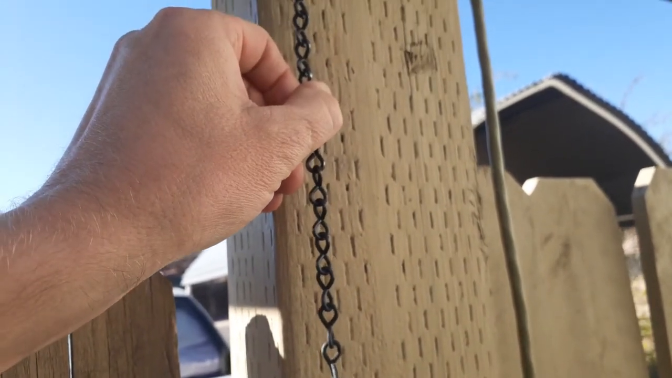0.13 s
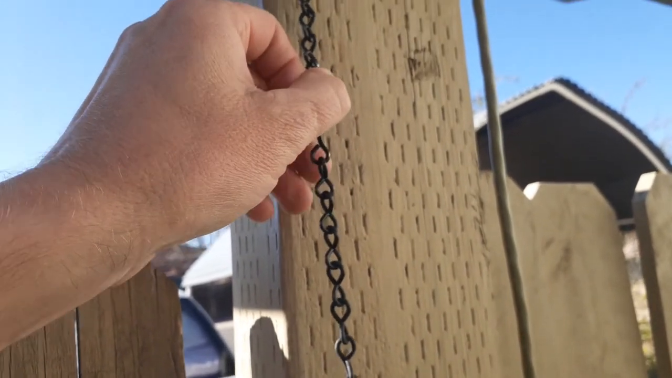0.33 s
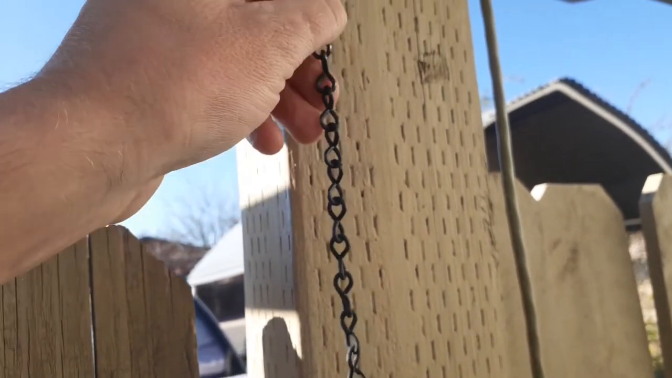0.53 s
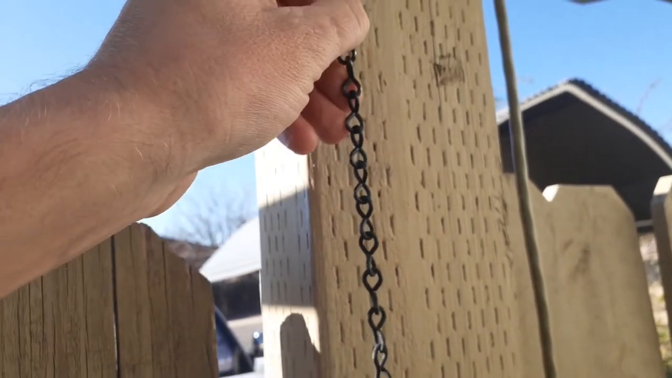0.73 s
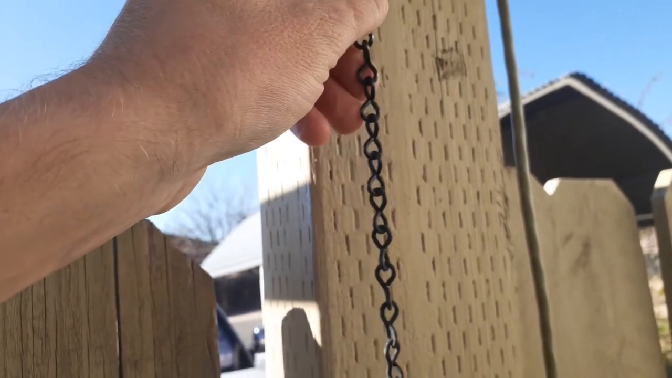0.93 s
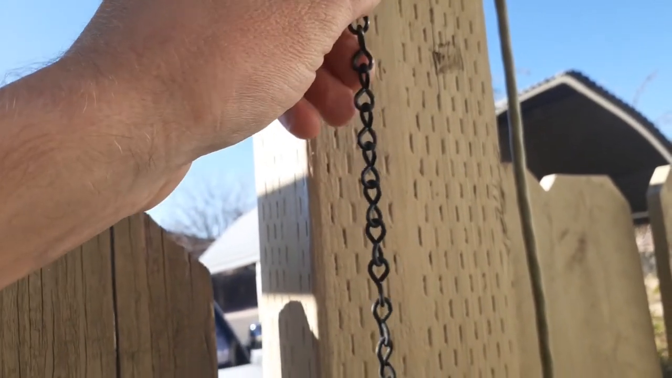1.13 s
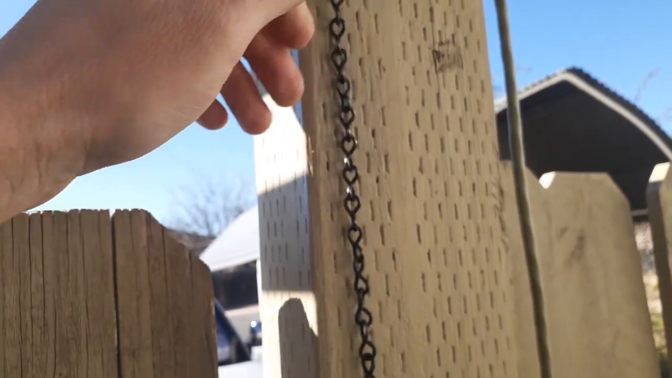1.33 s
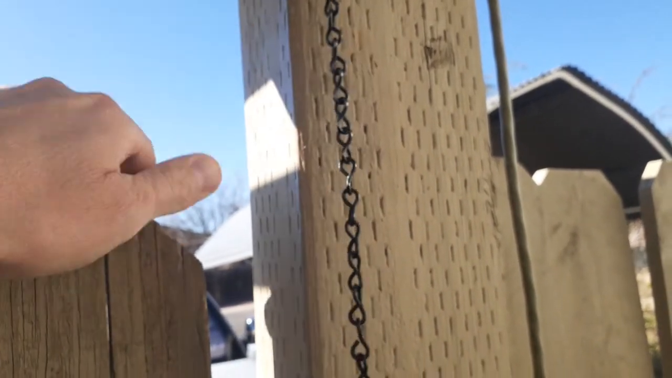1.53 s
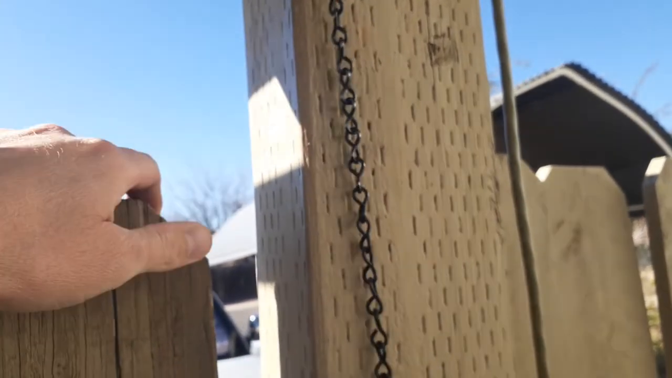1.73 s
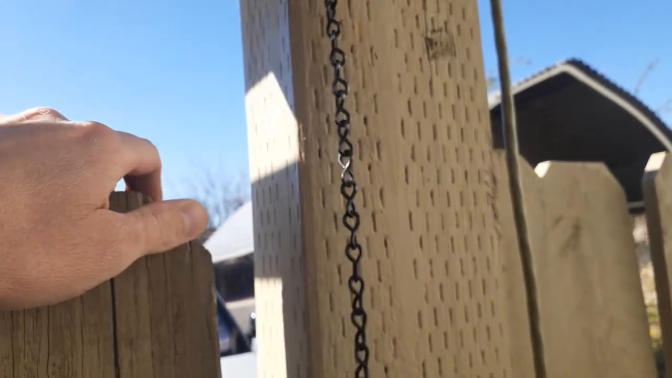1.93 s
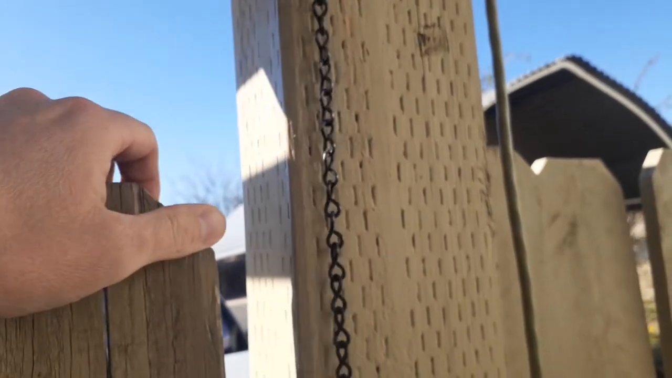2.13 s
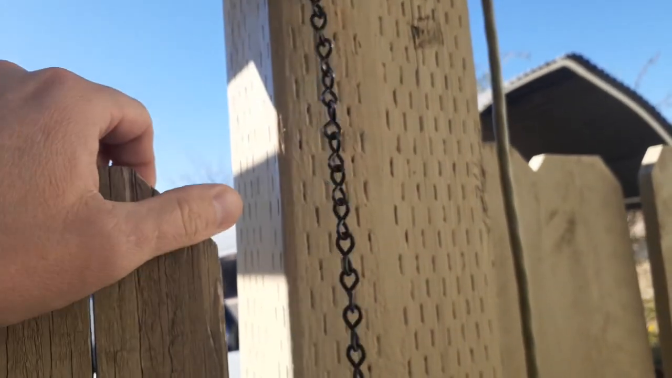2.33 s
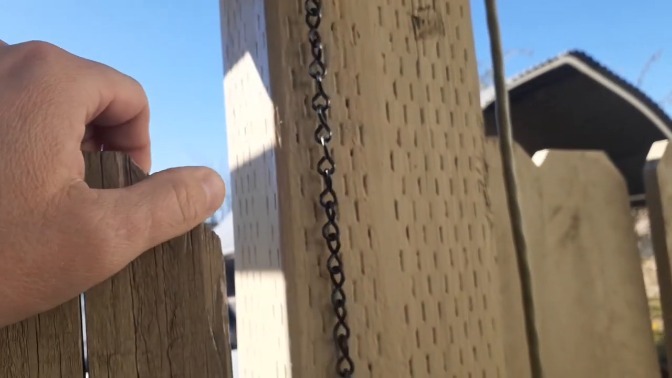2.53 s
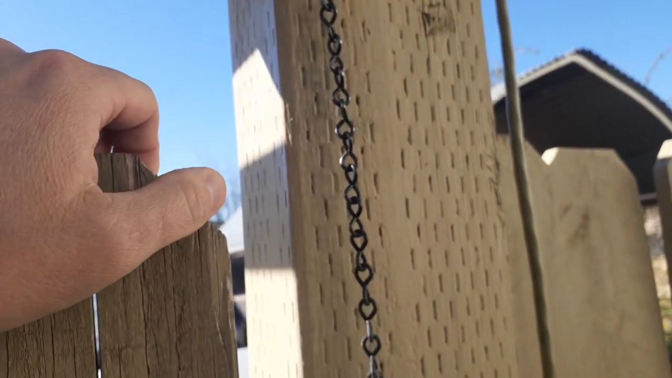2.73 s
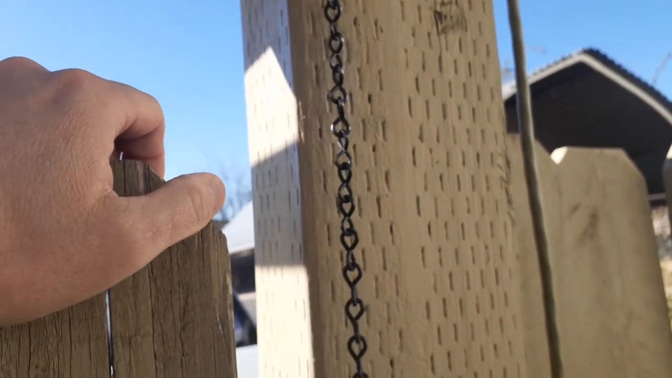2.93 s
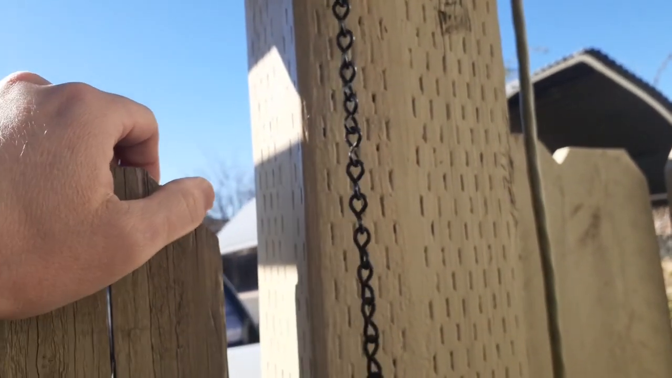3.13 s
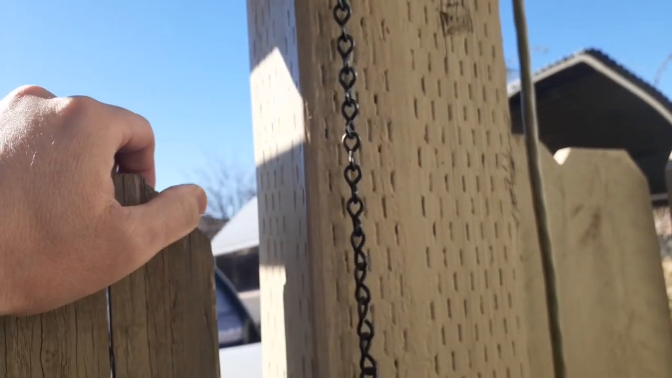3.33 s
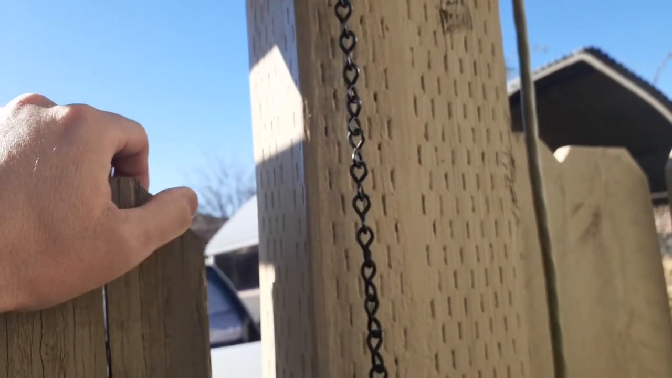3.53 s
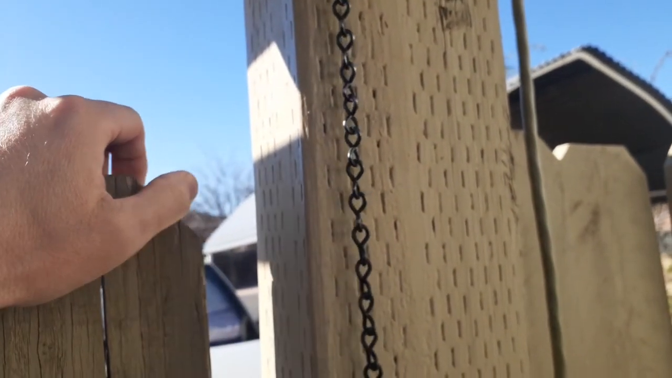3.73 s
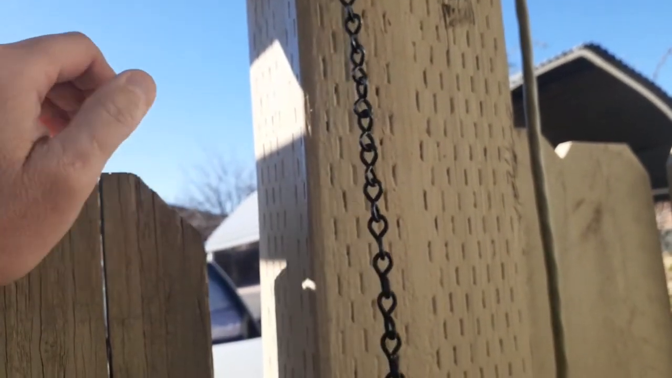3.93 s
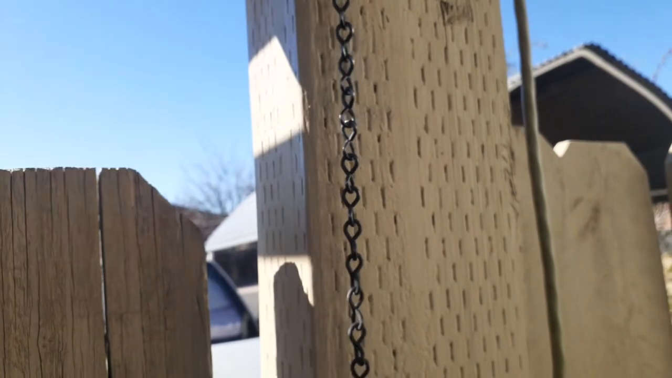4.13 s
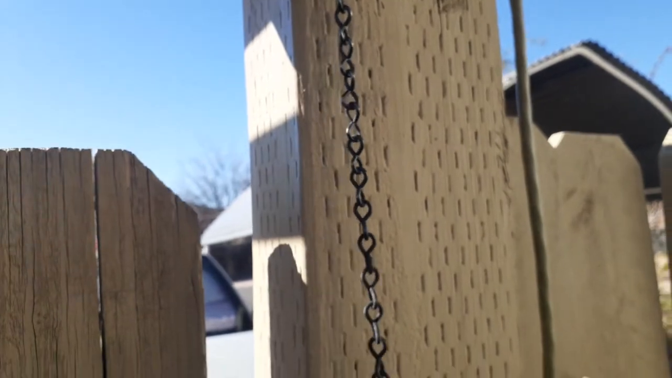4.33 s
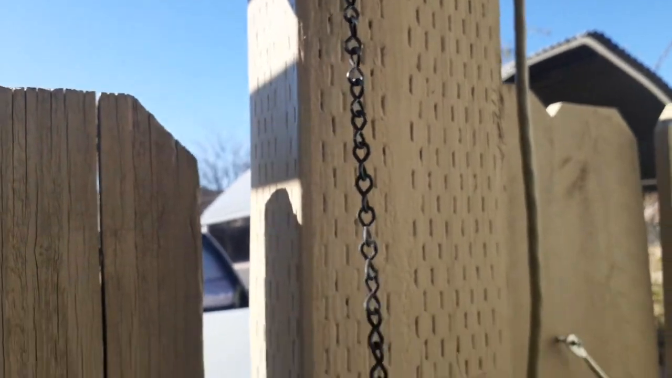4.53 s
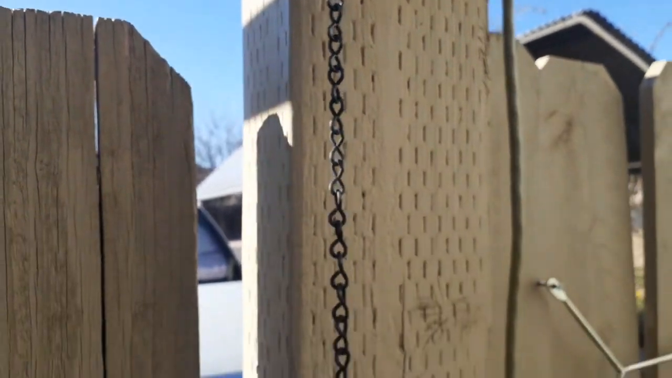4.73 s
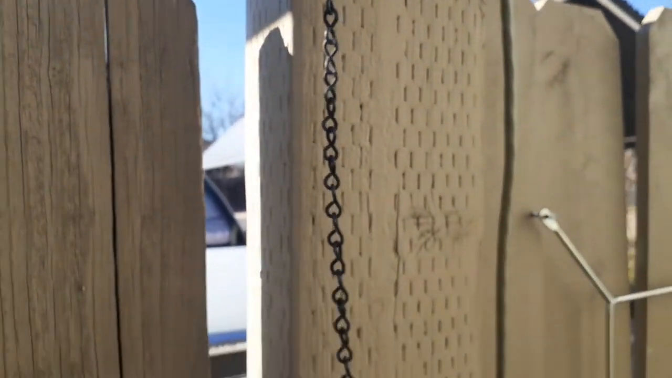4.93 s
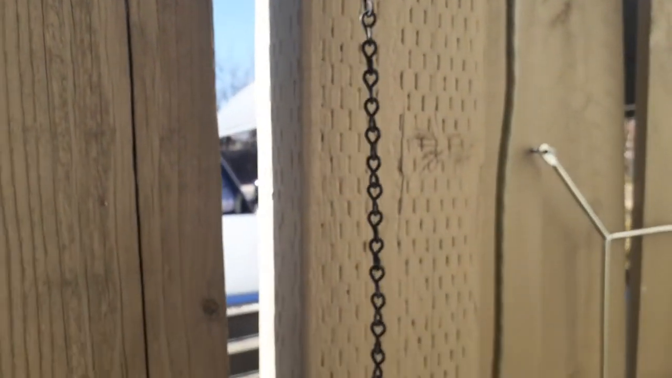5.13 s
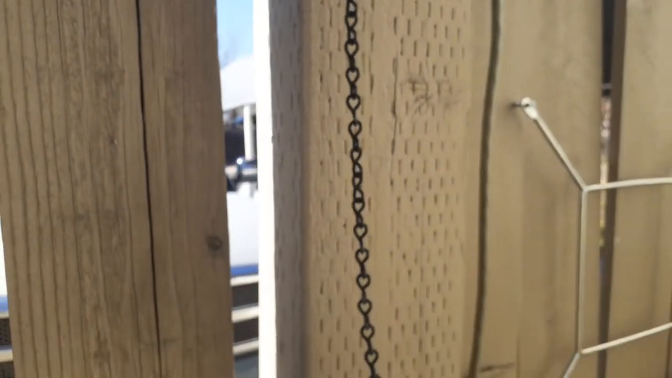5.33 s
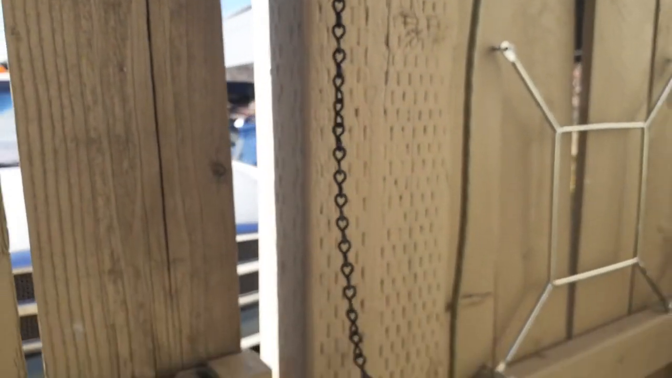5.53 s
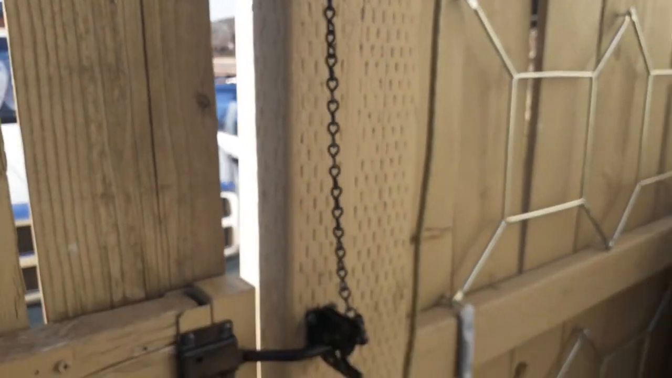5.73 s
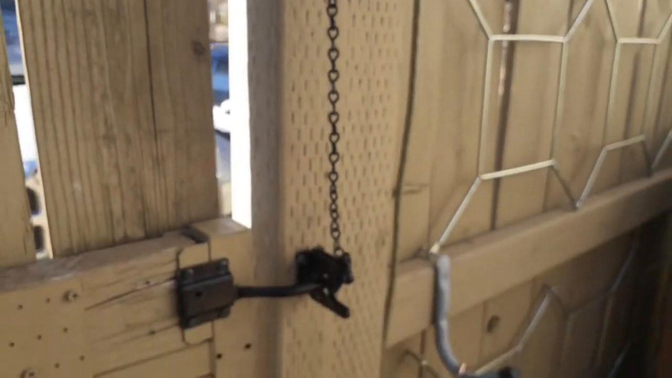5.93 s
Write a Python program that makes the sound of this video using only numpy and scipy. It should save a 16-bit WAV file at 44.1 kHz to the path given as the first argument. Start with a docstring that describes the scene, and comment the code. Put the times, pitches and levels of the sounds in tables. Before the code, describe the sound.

Close wooden knocks and bright chain jingles with a sharp steel latch clank outdoors, followed by gritty footsteps, faint birdsong and a low engine hum.

```python
"""Garden gate with a chain latch

A hand pulls a light chain that lifts the latch of a wooden garden gate, lets it go and eases the gate open.
Wood knocks are filtered noise that dies away; links and latch ring as sets of fading sine tones.
The hinge squeaks in unsteady tones, then shoes scuff on grit as grainy noise with short cracks.
Behind it an engine hums in sine tones, small birds twitter in rising chirps, and the air rumbles and hisses."""
import sys
import numpy as np
from scipy import signal
from scipy.fft import rfft, irfft, next_fast_len
from scipy.io import wavfile
from scipy.ndimage import uniform_filter1d

SR = 44100
rng = np.random.default_rng(int(sys.argv[2]) if len(sys.argv) > 2 else 0)


def generate_wav(sig):
    """Save sig (samples, or channels by samples) to the path in sys.argv[1] as 16-bit PCM at SR."""
    pcm = np.round(np.clip(np.atleast_2d(sig).T, -1, 1) * 32767).astype(np.int16)
    wavfile.write(sys.argv[1], SR, pcm)


N = 268833

# How alike noise is in the left and right channels: f/Hz, likeness (1 = the same, 0 = unrelated)
LIKENESS = [(60, 0.94), (250, 0.71), (600, 0.74), (1500, 0), (4000, 0.21), (16000, 0)]
# Colour of steel touching something hard: f/Hz, relative density/dB per Hz
STEEL_COLOUR = [(30, -40), (150, -25), (600, -9.5), (1200, 3.5), (2300, 4.5), (3300, -3), (4400, -3),
                (6200, 1), (7500, -8.5), (12000, -11.5), (16000, -9)]


def amp(db):
    """Turns decibels into a gain."""
    return 10 ** (np.asarray(db) / 20)


def evened(x):
    """Scales a sound to an rms of 1."""
    return x / np.sqrt(np.mean(x ** 2) + 1e-20)


def read(points, hz):
    """Reads a table between its points, along a log-frequency axis."""
    f, value = np.transpose(points)
    return np.interp(np.log(hz + 1), np.log(f + 1), value)


def add(mix, s, sound):
    """Mixes a stereo sound in at time s, cut off where the mix ends."""
    part = mix[:, max(round(s * SR), 0):][:, :sound.shape[1]]
    part += sound[:, :part.shape[1]]


def panned(side_db):
    """Gains of the two channels for a left-minus-right difference in dB."""
    return amp(np.array([[.5], [-.5]]) * side_db)


def pair(size):
    """Stereo noise whose channels are as alike at each frequency as LIKENESS says."""
    left, other = rfft(rng.standard_normal((2, size)))
    same = np.clip(read(LIKENESS, np.fft.rfftfreq(size, 1 / SR)), -1, 1)
    right = same * left + np.sqrt(1 - same ** 2) * other
    return irfft(np.array([left, right]), size)


def coloured(x, db):
    """Filters with the given dB at each frequency bin, without sounding ahead of the blow."""
    size = x.shape[1]
    log_gain = np.log(amp(np.r_[db, db[-2:0:-1]]))
    response = np.exp(np.conj(signal.hilbert(log_gain)))[:len(db)]  # minimum phase
    return irfft(rfft(x) * response, size)


def dying(x, t60):
    """Lets every band die at its own speed; t60 is the time to fall by 60 dB."""
    hz, t, bands = signal.stft(x, SR, nperseg=128)
    fade = 1e-3 ** (t / read(t60, hz)[:, None])
    return signal.istft(bands * fade, SR)[1][:, :x.shape[1]]


def lumps(hz, spacing_hz):
    """Random peaks and dips along frequency: each spot answers in its own way."""
    knots = np.arange(0, SR / 2, spacing_hz)
    return np.interp(hz, knots, rng.standard_normal(1024)[:len(knots)])


def spread(points, hz):
    """A spectrum in dB, scaled to a mean power of 1."""
    db = read(points, hz)
    return db - 10 * np.log10(np.mean(amp(db) ** 2))


def yard(x, size=16384, build_up_s=0.013):
    """Scattered echoes from fence, ground and house, as a tail of noise that builds up and dies away."""
    # Echo decay: f/Hz, time to fall by 60 dB/s
    echo_t60 = [(200, 1), (1500, 0.37), (5000, 0.33), (14000, 0.39)]
    t = np.arange(size) / SR
    tail = dying(pair(size), echo_t60) * (1 - np.exp(-t / build_up_s))
    return signal.fftconvolve(x, tail / np.linalg.norm(tail[0]), axes=1)[:, :N]


def engine(firing_hz=23.92, waver_hz=0.027, flutter=0.02):
    """A distant idling engine: tones at multiples of its firing rate, each wavering a little in level."""
    # Steady tones: multiple of the firing rate, relative level/dB
    steady_orders = [(5, -75), (8, -67.5), (9, -66.5), (12, -72.5), (15, -75), (16, -72), (20, -72)]
    # The two strongest tones over time: t/s, relative level of multiple 4/dB, of multiple 6/dB
    strong_orders = [(0.0, -68, -63), (0.05, -61, -56.5), (0.41, -64, -56.5), (0.54, -54.5, -53.5),
                     (0.69, -63, -55), (1.09, -64, -58.5), (1.34, -56, -54), (1.46, -58.5, -58),
                     (2.73, -55.5, -60), (3.14, -57.5, -66), (3.39, -54, -58.5), (4.23, -60, -67.5),
                     (5.82, -51.5, -61.5), (6.1, -52, -70)]
    t, knots = np.arange(N) / SR, np.arange(0, N / SR + 1, .2)

    def drift():
        """A slow random wander around zero."""
        return np.interp(t, knots, rng.standard_normal(len(knots)))

    turns = np.cumsum(firing_hz + waver_hz * drift()) / SR
    s, fourth_db, sixth_db = np.transpose(strong_orders)
    orders = steady_orders + [(4, np.interp(t, s, fourth_db)), (6, np.interp(t, s, sixth_db))]
    hum = np.zeros(N)
    for multiple, db in orders:
        height = amp(db) * (1 + flutter * drift())
        hum += height * np.sin(2 * np.pi * (multiple * turns + rng.random()))
    return np.sqrt(2) * hum


def air():
    """Far rumble and a fine hiss: shaped noise with a slowly changing level."""
    # Colour of the air: f/Hz, relative density/dB per Hz
    air_colour = [(15, -48), (25, -30), (43, -19), (74, -10.5), (108, -2.5), (217, -12), (300, -13),
                  (500, -19), (1160, -34), (2800, -43), (3900, -35), (7300, -51), (13600, -42),
                  (16000, -50)]
    # Loudness of the air: t/s, relative level/dB
    air_level = [(0, -63), (2.498, -60.5), (4.5, -61), (6.1, -59.5)]
    size = next_fast_len(N, real=True)
    gain = amp(read(air_colour, np.fft.rfftfreq(size, 1 / SR)))
    noise = irfft(rfft(pair(size)) * gain, size)[:, :N]
    return evened(noise) * amp(np.interp(np.arange(N) / SR, *np.transpose(air_level)))


def birds(chirps_per_s=21, direct=0.29, uneven_db=2):
    """Runs of quick rising chirps, each a little different; the run sinks slightly and echoes blur it."""
    # Bird phrases: start t/s, end t/s, middle pitch f/Hz, relative level/dB
    phrases = [(.05, 0.409, 4710, -80.5), (0.988, 1.54, 4420, -70.5), (1.654, 2.602, 3840, -68.5),
               (2.248, 2.738, 4670, -72.5), (2.535, 2.676, 5570, -76), (3.45, 4.047, 4725, -73),
               (4.075, 4.532, 4460, -77.5), (4.599, 5.006, 4530, -71.5), (5.082, 5.218, 4560, -74),
               (5.717, 6.1, 4310, -75.5)]
    phrase_fall, chirp_rise, chirp_spread = 0.045, .26, .03  # shares of the pitch
    out = np.zeros((2, N))
    for start, end, phrase_hz, db in phrases:
        size = max(round((end - start) * SR), 2)
        # number counts the chirps; progress runs from 0 to 1 within each
        number, progress = np.divmod(np.arange(size) / SR * chirps_per_s + rng.random(), 1)
        pitch, effort = rng.standard_normal((64, 2))[number.astype(int)].T
        sinking = phrase_fall * np.linspace(-.5, .5, size)
        hz = phrase_hz * (1 - sinking + chirp_rise * (progress - .5) + chirp_spread * pitch)
        loudness = np.sqrt(np.sin(np.pi * progress)) * amp(uneven_db * effort)
        song = np.sin(2 * np.pi * np.cumsum(hz) / SR) * loudness
        song = evened(song * signal.windows.tukey(size, .3))
        add(out, start, amp(db) * song * np.ones((2, 1)))
    return amp(3) * (direct * out + yard(out))


def knocks(level_db=-2.0, crack=0.12, crack_s=0.0018, size=8192, count=4):
    """Chain and latch hit wood, fall back ever weaker and leave it ringing; hard contacts are brighter."""
    # Knocks: t/s, relative level/dB, bass thud against that/dB, change one octave above treble_from_hz/dB
    contacts = [(.336, -61.5, 8, -18), (.421, -47.5, -3.5, -2.5), (0.443, -41.5, -7, -9.5),
                (.486, -30.5, -2.5, -5), (.503, -33.5, -10, -7.5), (.514, -30.5, -4.5, -9),
                (.608, -30, -19, -8.5), (.62, -41, 8, -7), (0.656, -62, 18, -2), (.721, -35, -17, -12),
                (0.778, -54.5, 12, -11.5), (.828, -48, -25.5, -19), (.852, -48, -3, -11.5),
                (0.862, -41, -9, -14), (.988, -48.5, -5, -26), (1.015, -55.5, -3, -8.5),
                (1.117, -59.5, 2, -23), (1.197, -41.5, -12, -7.5), (1.256, -32.5, -11.5, -8),
                (1.263, -36.5, -9, -3), (1.307, -35, -18, 0), (1.323, -40, -7, -2), (1.367, -38, -3, -10.5),
                (1.512, -43, -5, -7), (1.522, -41.5, -3, 0), (1.542, -33, -9.5, -6), (1.583, -40, 1, -14),
                (1.639, -50, 1.5, -5), (1.895, -48, 4, -10), (1.91, -41, -9, -8), (1.968, -32, -12, -4.5),
                (2.001, -49.5, 19, -5.5), (2.207, -60, 9, -4.5), (2.248, -67, 18.5, 0),
                (2.724, -43, -3, -10), (3.207, -42, -5, -5.5), (3.277, -44, 9.5, -14),
                (3.318, -41, 1.5, -10), (3.334, -36, -2.5, -18.5), (3.363, -47, 7, -6),
                (3.416, -53.5, 12.5, -6.5), (3.529, -48, 12.5, -6.5), (3.58, -34, -11, -3),
                (3.735, -57.5, 3, -3.5), (3.944, -57, -2.5, -4), (4.218, -54, 3, -10),
                (4.252, -46, -14, -11)]
    # Dense ring of post and boards: f/Hz, relative level/dB
    wood_colour = [(25, -27.5), (60, -9), (200, -3.5), (450, 2.5), (680, 2), (1200, 0), (1750, -1.5),
                   (2300, 1), (3200, 3), (4400, 3.5), (5400, 1.5), (6500, 7.5), (7400, -3.5), (11500, 5.5),
                   (15500, -1)]
    # How long the wood rings: f/Hz, time to fall by 60 dB/s
    wood_t60 = [(150, 0.17), (700, 0.21), (2000, 0.14), (5000, 0.089), (14000, 0.092)]
    # Wide resonances of the post: f/Hz, width/Hz, boost/dB
    post_peaks = [(695, 45, 6), (904, 50, 5), (1235, 60, 8), (1530, 50, 5), (2020, 70, 4), (2355, 80, 4),
                  (3374, 80, 4)]
    rebound_s, rebound_db, rebound_spread = 0.016, -11, 0.27  # spread is a share of the spacing
    treble_from_hz, treble_curve = 2000, 1.3  # a soft contact loses treble ever more steeply
    out, t, hz = np.zeros((2, N)), np.arange(size) / SR, np.fft.rfftfreq(size, 1 / SR)
    body_db = read(wood_colour, hz)
    for f, width, db in post_peaks:
        body_db = body_db + db / (1 + (2 * (hz - f) / width) ** 2)
    middle = (hz > 600) * (hz < 1400)  # this band sets the overall scale
    body_db -= 10 * np.log10(np.mean(amp(body_db) ** 2 * middle))
    attack = (1 - np.exp(-t / .0005)) * (1 + crack * np.exp(-t / crack_s))
    bass = read([(420, 1), (720, 0)], hz)  # the thud's share: all below 420 Hz, none above 720 Hz
    treble_octaves = np.log2(np.maximum(hz / treble_from_hz, 1)) ** treble_curve
    for s, db, thud_db, hardness in contacts:
        spot_db = 3.5 * lumps(hz, 85) + 2 * lumps(hz, 450)
        blow = np.zeros((2, size))
        for k, late in enumerate(rng.uniform(-1, 1, count)):
            hit = dying(pair(size), wood_t60) * attack
            add(blow, k * rebound_s * (1 + rebound_spread * late), amp(k * rebound_db) * hit)
        colour_db = body_db + thud_db * bass + hardness * treble_octaves + spot_db
        add(out, s, amp(db + level_db) * coloured(blow, colour_db))
    return out


def rubbing(strokes, spectrum, grain_db, lump_db, swell=0.42, size=16384):
    """Sliding contact: a stream of tiny slips of uneven size under each stroke."""
    out, t, hz = np.zeros((2, N)), np.arange(size) / SR, np.fft.rfftfreq(size, 1 / SR)
    for start, end, db, tilt_db in strokes:
        slips = np.repeat(np.minimum(rng.exponential(1, size // 64), 4), 64)  # 64 samples each
        grains = pair(size) * amp(grain_db * slips)
        tilt = tilt_db * np.log2(hz / 1000 + .1)
        rub = evened(coloured(grains, spread(spectrum, hz) + tilt + lump_db * lumps(hz, 200)))
        stroke = abs(np.sin(np.pi * np.clip(t / (end - start), 0, 1))) ** swell
        add(out, start, amp(db) * rub * stroke)
    return out


def drag():
    """The chain drags over wood in short grainy slides."""
    # Slides: start t/s, end t/s, level before the swell/dB, brightness/dB per octave
    slides = [(.422, .48, -47.5, -1.5), (1.915, 1.965, -42, -7), (3.215, 3.42, -47.5, -8),
              (3.46, 3.52, -52.5, -5)]
    return rubbing(slides, STEEL_COLOUR, grain_db=2.0, lump_db=7.0)


def ringing(blows, modes, favour_db, favour_octaves, detune, uneven_db, scatter, scatter_s, size=12288):
    """Steel rings in fading tones; where a blow lands favours some, and near wood scatters them to each ear."""
    out, t = np.zeros((2, N)), np.arange(size) / SR
    hz, mode_db, t60 = np.transpose(modes)
    for s, db, strongest_hz, side_db in blows:
        favoured = np.exp(-(np.log2(hz / strongest_hz) / favour_octaves) ** 2)
        height = amp(mode_db + favour_db * favoured + uneven_db * rng.standard_normal(len(hz)))
        pitch = hz * (1 + detune * rng.standard_normal(len(hz)))
        # unlike channels get unlike phases
        apart = np.sqrt(1 - np.clip(read(LIKENESS, hz), 0, 1)) * rng.uniform(-.6, .6, (2, len(hz)))
        waves = np.sin(2 * np.pi * pitch[:, None] * t + np.pi * apart[..., None])
        fade = np.exp(-np.log(1000) * t / t60[:, None])
        ring = (waves * height[:, None] * fade).sum(1) / np.linalg.norm(height)
        ring = ring * (1 - np.exp(-t / .0003))  # soft start
        echoes = pair(size) * np.exp(-t / scatter_s)
        echoes = echoes / np.linalg.norm(echoes[0])
        ring = ring + scatter * signal.fftconvolve(ring, echoes, axes=1)[:, :size]
        add(out, s, amp(db) * panned(side_db) * ring)
    return out


def chain(neighbour_db=-13, lag_s=0.0098, side_db=7):
    """Each tap rings a link and jostles its neighbour, a slightly different link, a moment later."""
    # Links tapping each other: t/s, relative level/dB, strongest ring f/Hz
    pings = [(.441, -48, 13570), (.475, -35, 11900), (1.207, -36, 14900), (1.23, -31.5, 13400),
             (1.272, -24.5, 14200), (1.33, -34, 14400), (1.365, -29, 14290), (1.499, -40, 14280),
             (1.525, -25.5, 12900), (1.542, -28, 13400), (1.721, -41.5, 15200), (1.911, -48.5, 13600),
             (1.982, -29.5, 13200), (2.206, -30, 14280), (2.727, -55, 13420), (3.23, -52, 13420),
             (3.36, -44, 14100), (3.416, -42.5, 14300), (3.58, -31, 14000), (3.63, -41, 13200),
             (3.705, -45, 14700), (3.895, -43.5, 13650)]
    # Tones of a link: f/Hz, relative level/dB, time to fall by 60 dB/s
    link_modes = [(5140, -28, .2), (5650, -28, .13), (7840, -25, .2), (9265, -23, .13), (11420, -27, .16),
                  (11910, -12, .11), (13380, -2, .07), (13490, -3, .1), (14280, 1, .115), (14530, -13, .11),
                  (14780, -13, .11), (15200, -17, .08)]
    taps = np.array([(s, db, hz, side_db) for s, db, hz in pings])
    jostled = taps + np.outer(rng.uniform(.5, 1.5, len(taps)), [lag_s, 0, 0, 0])
    first = ringing(taps, link_modes, favour_db=7, favour_octaves=.04, detune=.0008, uneven_db=1.5,
                    scatter=.4, scatter_s=.005)
    second = ringing(jostled, link_modes, favour_db=3, favour_octaves=.1, detune=.02, uneven_db=5,
                     scatter=1.2, scatter_s=.008)
    return amp(0.5) * first + amp(neighbour_db) * second


def cracking(hits, spectrum, crack_s, lump_db, size=4096):
    """Very short contacts between hard things, each with a colour of its own."""
    out, t, hz = np.zeros((2, N)), np.arange(size) / SR, np.fft.rfftfreq(size, 1 / SR)
    for s, db, side_db in hits:
        burst = pair(size) * np.exp(-t / crack_s)
        crack = coloured(burst, spread(spectrum, hz) + lump_db * lumps(hz, 700))
        add(out, s, amp(db) * panned(side_db) * crack)
    return out


def latch(count=3, bounce_s=.0027, bounce_db=-5.5):
    """The lever cracks against its keeper, bounces quickly, steel on steel, and rings."""
    # Hard blows: t/s, crack level/dB, relative ring level/dB, strongest ring f/Hz, left minus right/dB
    clanks = [(.514, -53, -52, 700, -6), (.620, -25.5, -37, 1220, 2.5), (1.264, -43, -32.5, 1250, -2.5),
              (1.307, -13.5, -28, 2400, 0), (1.522, -31, -45.5, 897, 6), (1.542, -52.5, -34.5, 880, -4),
              (1.969, -33.5, -29, 6380, -4.5), (1.982, -50, -33.5, 315, 3), (3.580, -32, -29, 900, 1)]
    # Tones of the latch on its post: f/Hz, relative level/dB, time to fall by 60 dB/s
    latch_modes = [(315, -3, .2), (695, -1, .14), (904, 0, .12), (1235, 1, .13), (1530, -3, .12),
                   (2010, -4, .12), (2355, 0, .11), (3374, -5, .11), (4170, -6, .09), (4770, -3, .09),
                   (5650, -9, .09), (6080, -1, .07), (6570, -2, .12), (6730, -9, .12)]
    blows, bounces = [], []
    for s, crack_db, ring_db, hz, side_db in clanks:
        blows.append((s + bounce_s, ring_db, hz, side_db))  # the ring starts at the first bounce
        for k in range(count):
            bounces.append((s + k * bounce_s, crack_db + k * bounce_db, side_db))
    ring = ringing(blows, latch_modes, favour_db=12, favour_octaves=.12, detune=.003, uneven_db=1,
                   scatter=.7, scatter_s=.005)
    return amp(-2) * ring + cracking(bounces, STEEL_COLOUR, crack_s=0.0021, lump_db=0.5)


def hinge(jitter=0.042):
    """Thin tones of unsteady pitch squeak faintly as the gate turns."""
    # Squeaks: start t/s, end t/s, first f/Hz, last f/Hz, level/dB
    squeaks = [(3.076, 3.227, 1990, 1980, -82.5), (5.623, 5.842, 900, 1007, -75)]
    out = np.zeros((2, N))
    for start, end, first_hz, last_hz, db in squeaks:
        size = round((end - start) * SR)
        wobble = evened(uniform_filter1d(rng.standard_normal(size), size=200))
        hz = np.linspace(first_hz, last_hz, size) * (1 + jitter * wobble)
        tone = np.sin(2 * np.pi * np.cumsum(hz) / SR) * np.hanning(size)
        add(out, start, amp(db) * evened(tone) * np.ones((2, 1)))
    return out


def shoes(count=2, stone_db=2, stone_spread_db=3.5, side_db=-1):
    """Soles rub over fine grains; small stones crack under each scuff, and now and then a large one."""
    # Soles sliding: start t/s, end t/s, relative level/dB, brightness/dB per octave
    scuffs = [(4.383, 4.451, -62, 7), (4.699, 4.9, -67, -3), (4.879, 4.998, -56.5, -1),
              (5.272, 5.354, -45, -1), (5.334, 5.49, -62.5, -1.5), (5.535, 5.611, -53.5, -0.5),
              (5.585, 5.689, -68.5, 2)]
    # Large stones cracking: t/s, relative level/dB, left minus right/dB
    large = [(4.8147, -49, 12), (4.9682, -48, 6.5), (5.2774, -37, -2), (5.3248, -30, -3),
             (5.3794, -43.5, -10), (5.446, -43, 1), (5.4934, -42, -1), (5.5503, -49, -14),
             (5.5684, -33, -12), (5.6407, -44.5, -1)]
    # Colour of soles on grit: f/Hz, relative density/dB per Hz
    sole_colour = [(30, -40), (150, -24), (600, -13), (850, 0), (1350, 3), (1700, -2), (2600, -3),
                   (4000, -7), (8000, -8), (12000, -7), (16000, -12)]
    rub = rubbing(scuffs, sole_colour, grain_db=3.3, lump_db=2.2)
    small = []
    for start, end, db, _ in scuffs:
        for _ in range(count):
            level_db = db + stone_db + stone_spread_db * rng.standard_normal()
            small.append((rng.uniform(start, end), level_db, side_db))
    stones = cracking(large + small, sole_colour, crack_s=.0025, lump_db=3)
    return amp(0.5) * rub + amp(-3.5) * stones


def scene():
    """The gate close by, with its faint echoes, and the yard around it."""
    near = knocks() * panned(side_db=0.77) + drag() + chain() + latch() + hinge() + shoes()
    far = amp(-1) * engine() + amp(1.13) * air()
    return near + amp(-19.5) * yard(near) + far * panned(side_db=2.0) + birds()


def record(dry, edge_hz=16000):
    """Takes away the treble above the edge with a steep low-pass filter."""
    low_pass = signal.firwin(255, edge_hz, window=("kaiser", 8), fs=SR)
    return signal.oaconvolve(dry, low_pass[None], "same")


dry = scene()
out = record(dry)
generate_wav(out)
```